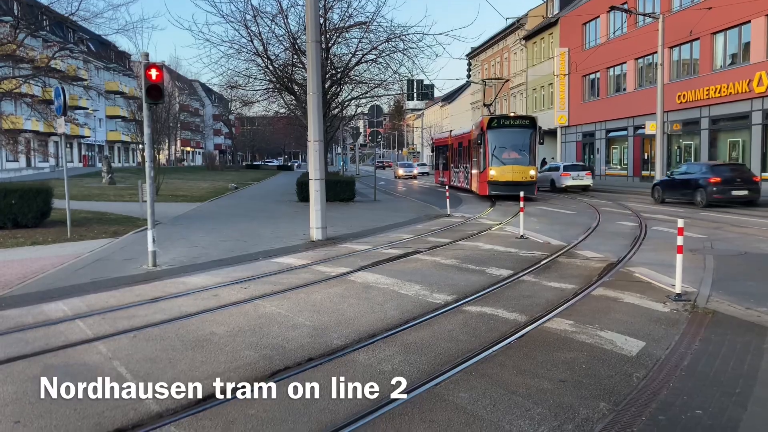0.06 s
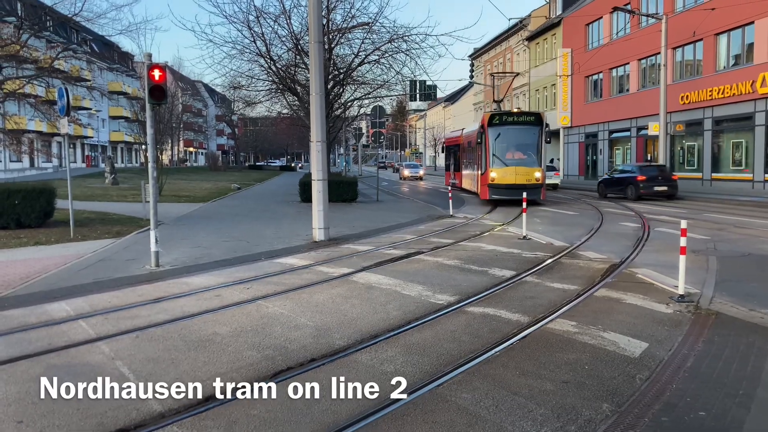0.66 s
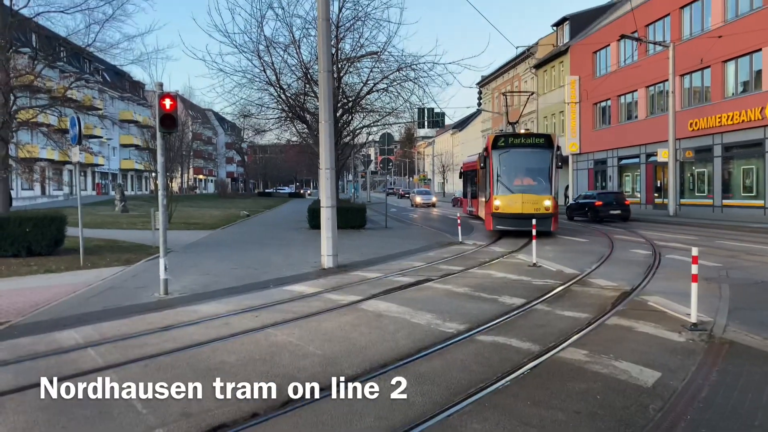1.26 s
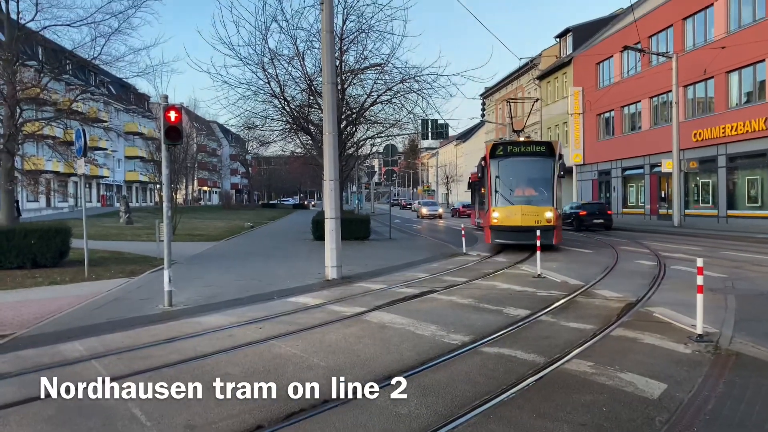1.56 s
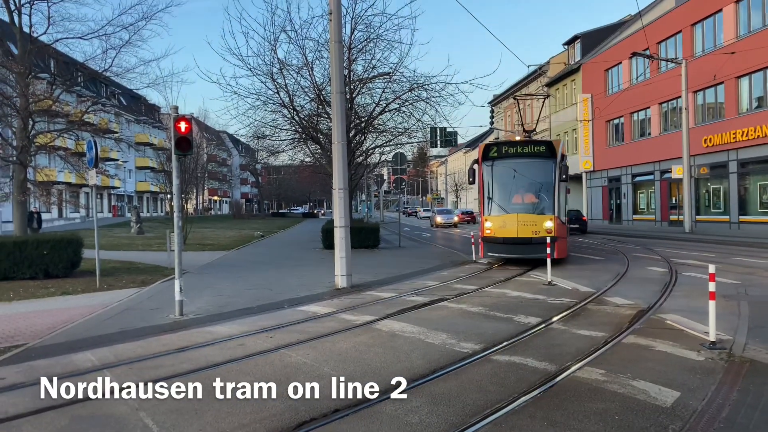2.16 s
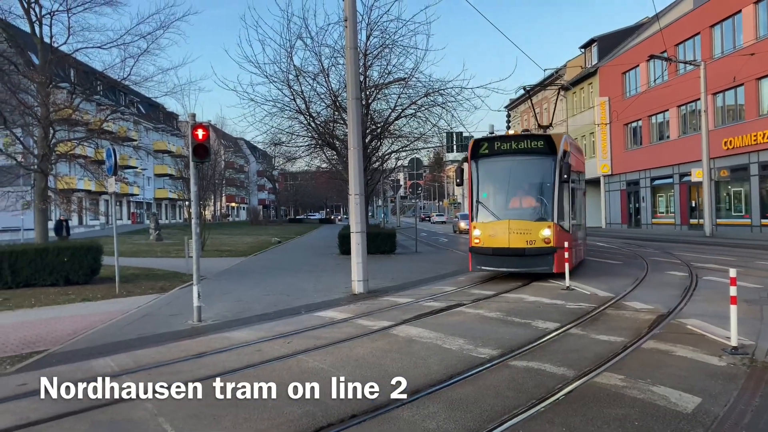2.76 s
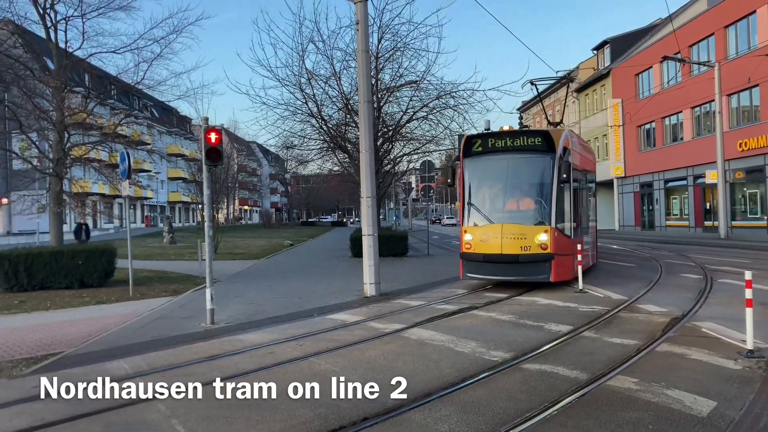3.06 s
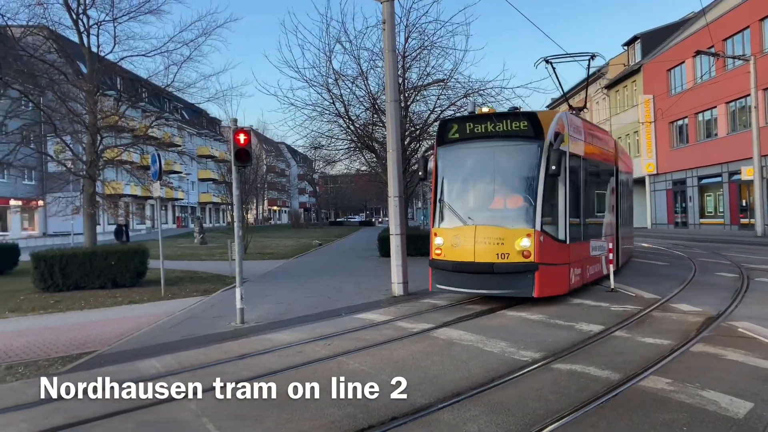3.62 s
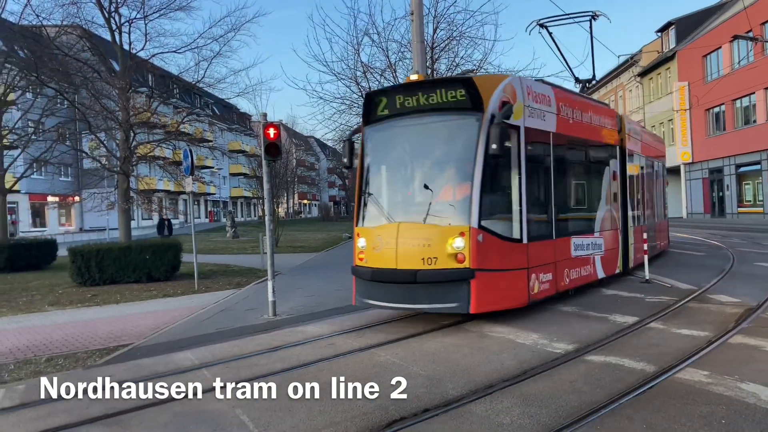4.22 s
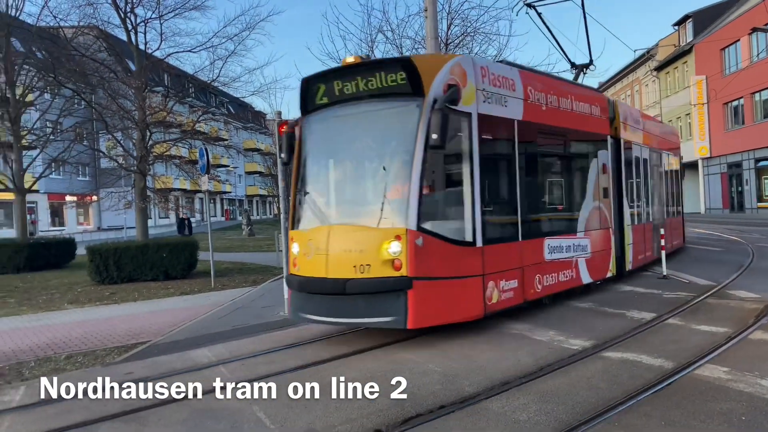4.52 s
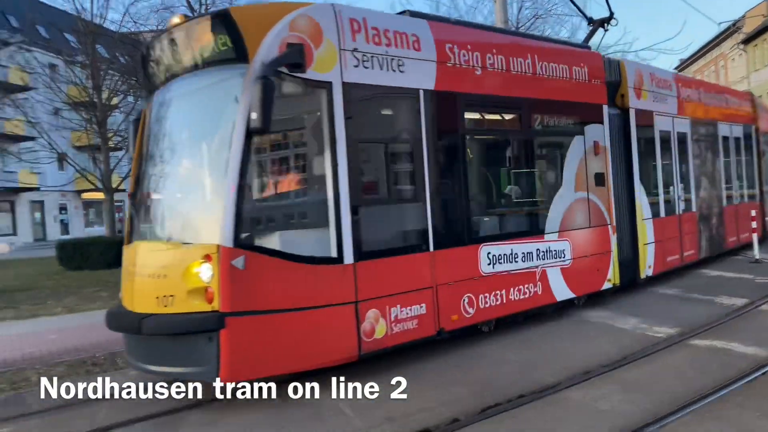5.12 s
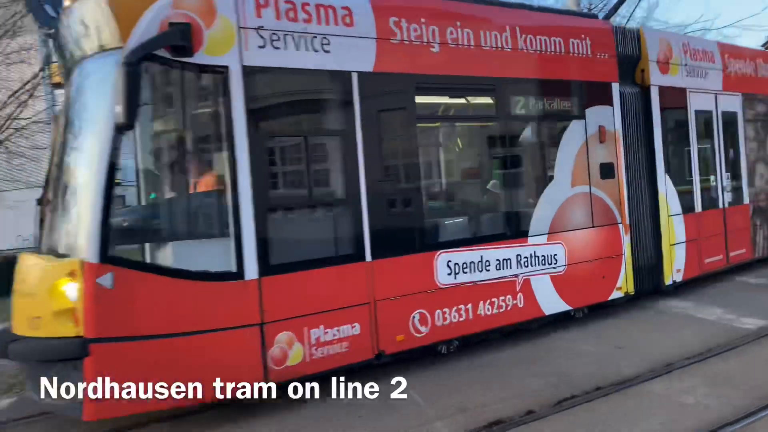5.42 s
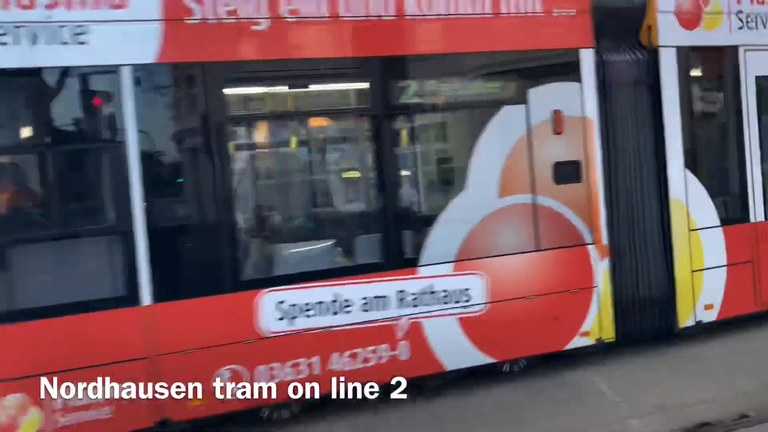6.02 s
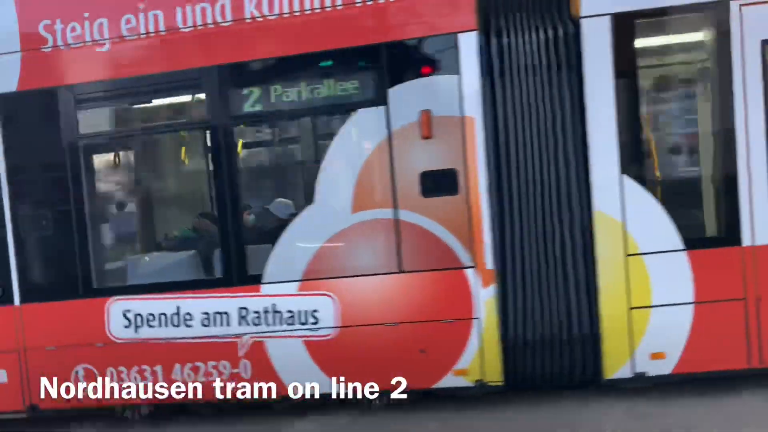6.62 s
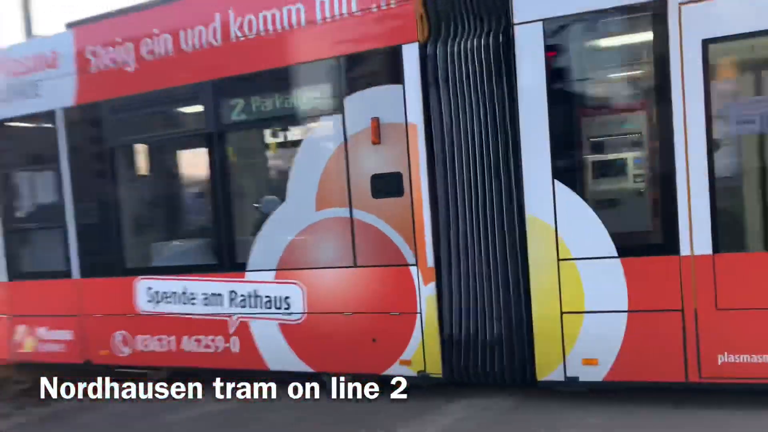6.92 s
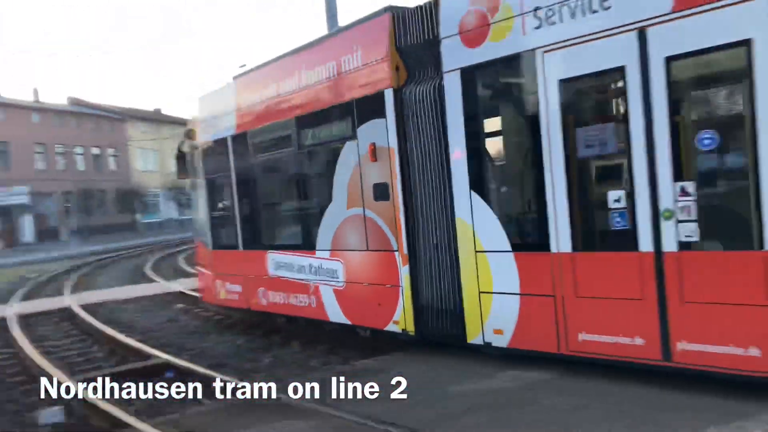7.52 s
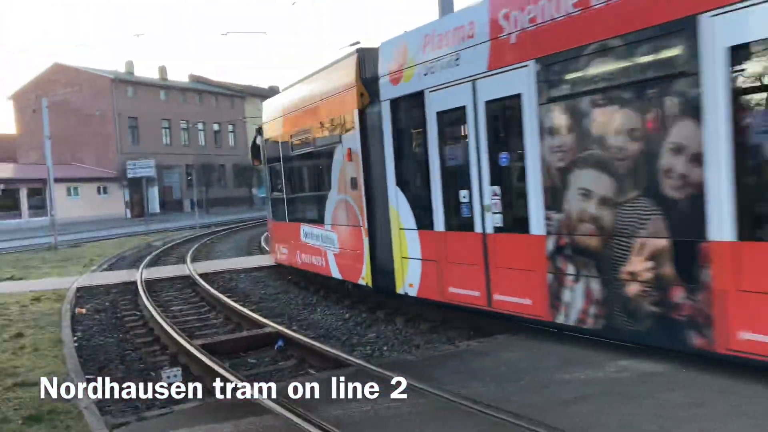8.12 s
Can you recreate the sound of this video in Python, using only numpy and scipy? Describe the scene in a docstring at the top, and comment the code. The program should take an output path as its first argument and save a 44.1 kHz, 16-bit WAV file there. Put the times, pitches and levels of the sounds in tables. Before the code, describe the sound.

On a street curve, a tram rumbles nearer, clicking over rail joints above a faint hiss of departing cars. In the second half it rolls right past a hand-held microphone, louder, with humming gears, a high motor whine and steel wheels rubbing and ringing on the rails. Soft gusts touch the microphone, and a short squeak and a few heavy thuds come as it keeps rolling by.

```python
"""On a street curve, a low-floor tram rolls past about two metres from a hand-held phone.
Rail roughness forces its body to drone and rumble and its wheels to roar; the rubbing flanges hiss,
squeak and ring the wheel discs, gears hum, and the traction inverter whines with a Doppler shift.
Wheels clack and thud over rail joints, the house fronts reflect the clacks, and later grit ticks.
Air buffets the two microphone ports, and the tyre noise of cars fades up the street."""
import sys
import numpy as np
from scipy import signal
from scipy.fft import rfft, irfft
from scipy.io import wavfile

SR = 44100
rng = np.random.default_rng(int(sys.argv[2]) if len(sys.argv) > 2 else 0)


def pcm_store(signal):
    """Save signal as 16-bit PCM."""
    levels = np.round(np.clip(np.atleast_2d(signal), -1, 1) * 32767)
    wavfile.write(sys.argv[1], SR, levels.astype(np.int16).T)


N = 365148
TIME, FREQ = np.arange(N) / SR, np.arange(N // 2 + 1) * SR / N
TRAM_M_S, SOUND_M_S = 3.2, 343

# normal modes of a wheel disc: f/Hz, bandwidth before added damping/Hz, level/dB
WHEEL_MODES = [(630, 20, -2), (740, 14, 3), (850, 17, 0), (945, 15, 3), (1040, 15, 1.5), (1240, 14, -2),
               (1410, 18, -2), (1565, 14, 1.5), (1705, 16, 0), (2010, 20, -8), (2260, 16, -4),
               (2450, 18, -9), (3120, 18, -14)]
# bright, uneven treble hiss spectrum, with a dip near 9.5 kHz: f/Hz, level/dB
HISS_SPECTRUM = [(2500, -39), (4500, 1), (5700, -6.5), (7800, 2.5), (9500, -4.5), (11500, 0.5),
                 (13000, -10.5), (15500, -11.5)]


def undb(db):
    """Amplitude ratio of a level in decibels."""
    return 10 ** (np.asarray(db) / 20)


def unit(x):
    """Normalisation to rms 1."""
    return x / np.sqrt(np.mean(x ** 2))


def curves(table):
    """Linear interpolation of a table's columns over time."""
    times, *columns = np.transpose(table)
    return [np.interp(TIME, times, column) for column in columns]


def across(points):
    """Interpolation of (f/Hz, value) points on a log-frequency axis."""
    hz, value = np.transpose(points)
    return np.interp(np.log(FREQ + 1), np.log(hz), value)


def resonance(hz, width_hz):
    """Frequency response of a damped harmonic oscillator."""
    return 1 / (1 + 1j * (FREQ ** 2 - hz ** 2) / (FREQ * width_hz + 1e-9))


def walk(rate_hz, step=32):
    """Low-pass Gaussian fluctuation of rms 1 and bandwidth about rate_hz."""
    hz = np.fft.rfftfreq(16384, step / SR)
    coarse = irfft(rfft(rng.standard_normal(16384)) * np.exp(-(hz / rate_hz) ** 2))
    return unit(np.interp(np.arange(N) / step, np.arange(len(coarse)), coarse))


def noise(response):
    """Filtered noise, partially coherent between the two ports and most alike in the bass."""
    # likeness of the ports: f/Hz, coherence (0-1)
    port_coherence = [(60, .97), (130, .97), (290, .93), (640, .8), (1400, .66), (3000, .3), (5000, .4),
                      (7000, .85), (15000, .85)]
    coherence = np.clip(across(port_coherence), 0, 1)
    mid, side = rfft(rng.standard_normal((2, N)))
    spectra = mid * np.sqrt(1 + coherence) + np.array([[1], [-1]]) * side * np.sqrt(1 - coherence)
    return unit(irfft(response * spectra, N))


def narrow(hz, smear_hz):
    """Narrow-band noise: a carrier with random quadrature amplitudes."""
    phase = 2 * np.pi * np.cumsum(hz + np.zeros(N)) / SR
    return walk(smear_hz) * np.sin(phase) + walk(smear_hz) * np.cos(phase)


def wavering(hz, jitter_hz, rate_hz):
    """Random frequency modulation of a tone of constant amplitude."""
    return np.sqrt(2) * np.sin(2 * np.pi * np.cumsum(hz + jitter_hz * walk(rate_hz)) / SR)


def burst(start, rise, fade):
    """Envelope of a transient: linear rise, exponential decay."""
    age = np.maximum(TIME - start, 0)
    return np.minimum(age / rise, 1) * np.exp(-np.minimum(np.maximum(age - rise, 0) / fade, 20))


def add(track, start, sound):
    """Superposition of a short sound on a track."""
    room = track[:, int(start * SR):][:, :sound.shape[-1]]
    room += sound[..., :room.shape[1]]


def later(x, lag_s):
    """A time-varying delay."""
    return np.interp(TIME - lag_s, TIME, x)


def nearness(passes_s, distance_m):
    """Spherical spreading: the 1/r gain of a moving source, 1 at closest approach."""
    return distance_m / np.hypot(distance_m, TRAM_M_S * (TIME - passes_s))


def go_by(passes_s, distance_m, far_db, shade_db_per_s=0):
    """Direct and diffuse fields add in power; once a part is past, the body may screen it."""
    shade_db = shade_db_per_s * np.maximum(TIME - passes_s, 0)
    return np.hypot(nearness(passes_s, distance_m), undb(far_db)) * undb(-shade_db)


def doppler(passes_s=6.3, distance_m=3):
    """Doppler ratio: above 1 on approach, below 1 on retreat."""
    along = TRAM_M_S * (TIME - passes_s)
    return 1 - TRAM_M_S / SOUND_M_S * along / np.hypot(along, distance_m)


def passing(x, reflection=0.084, far_s=0.00238, near_s=0.01, lead_ms=0.28):
    """Comb filtering by a road reflection; its delay and the left port's lead grow as the wheels near."""
    near = nearness(passes_s=5.85, distance_m=2.03) ** 2
    detour_s = far_s + (near_s - far_s) * near
    left, right = ((side + reflection * later(side, detour_s)) / np.hypot(1, reflection) for side in x)
    return np.array([left, later(right, lead_ms * near / 1000)])


def street(x, t60, wet_db):
    """Reverberation: the house fronts return a dull, diffuse tail."""
    age = TIME[:SR]
    tail = rng.standard_normal((2, SR)) * undb(-60 * age / t60) * (age > .02)
    tail = signal.sosfilt(signal.butter(1, [250, 3000], "band", fs=SR, output="sos"), tail)
    tail /= np.sqrt(np.sum(tail ** 2) / 2)
    return x + undb(wet_db) * signal.fftconvolve(x, tail, axes=1)[:, :N]


def cars(hiss_db=-56, tread_db=-48, leave_s=1.76, fade_db_per_s=17):
    """Broadband tyre noise holds, then fades as the cars drive off."""
    hiss = undb(hiss_db) * noise(undb(across(HISS_SPECTRUM)))
    tread = undb(tread_db) * noise(resonance(1450, 1700) ** 2)
    return (hiss + tread) * undb(walk(4.2) - fade_db_per_s * np.maximum(TIME - leave_s, 0))


def draught(breeze_db=-44, eddy_db=-5, buffet_db=-4):
    """Turbulent pressure at the ports, from a light breeze and air dragged along by the tram."""
    # gusts of air: t/s, level/dB, rise/s, decay/s
    gust_events = [(3.9, -38, 0.083, .08), (4.8, -23, 0.14, 0.1), (5.76, -26, 0.076, 0.057),
                   (7.92, -19, 0.086, .18)]
    gusts = sum(undb(db) * burst(s, rise, fade) for s, db, rise, fade in gust_events)
    eddies = unit(irfft(rfft(rng.standard_normal((2, N))) * resonance(73, 85) ** 2, N))
    buffet = undb(buffet_db) * gusts * noise(resonance(45, 22) ** 2)
    return eddies * (undb(breeze_db) + undb(eddy_db) * gusts) + buffet


def treble_bursts():
    """Band-limited transients that decay exponentially: the hiss of two far clacks, then ticks of grit."""
    # short bursts of treble: t/s, level/dB, decay/s, lowest f/Hz, highest f/Hz
    transients = [(0.376, -50.5, 0.059, 6500, 12000), (.675, -51, 0.082, 6500, 12000),
                  (3.65, -39, 0.011, 2000, 3364), (3.711, -43, 0.0037, 4000, 5500),
                  (3.718, -41, 0.021, 1990, 3400), (3.727, -50, 0.018, 4000, 5640),
                  (4.844, -36.5, 0.015, 6800, 12100), (5.298, -45, 0.0098, 6960, 12000),
                  (6.259, -35, .0034, 9600, 12700), (7.46, -48, 0.0011, 3020, 12000),
                  (7.695, -31, 0.00078, 7230, 15540), (7.707, -39, .0015, 7000, 15500),
                  (7.725, -44, .015, 7000, 15000)]
    out, age = np.zeros((2, N)), TIME[:SR // 3]
    for s, db, fade, low_hz, high_hz in transients:
        band = signal.butter(3, [low_hz, high_hz], "band", fs=SR, output="sos")
        hiss = unit(signal.sosfilt(band, rng.standard_normal((2, len(age)))))
        add(out, s, undb(db) * hiss * np.exp(-age / fade))
    return out


def inverter(low_hz=3020, high_hz=6705, high_db=-55.5, sideband_db=-62):
    """Doppler-shifted switching tones of the traction drive, the high one with two lower sidebands."""
    # low whine as the roof units turn towards the listener and away: t/s, level/dB
    low_levels = [(0, -82), (2.5, -66.5), (3.3, -65), (4.2, -60), (4.7, -53.5), (5.0, -56), (5.55, -56.5),
                  (5.68, -47.5), (5.95, -54), (6.1, -51.5), (6.4, -58), (6.8, -57), (7.5, -65)]
    step_hz = 95 * (TIME < 4.15)  # the pitch steps up as the drive changes gear
    sag_hz = 36 * np.maximum(TIME - 6.1, 0)  # and sinks as the tram eases off
    heard_hz = (high_hz - step_hz - sag_hz) * doppler()
    # the low tone reaches each port by its own path
    low = np.array([wavering(low_hz * doppler(), 11, 35) * undb(1.2 * walk(14)) for port in range(2)])
    high = wavering(heard_hz, 10, 30) * undb(high_db + 2.5 * walk(20))
    sidebands = sum(narrow(heard_hz - offset_hz, 30) for offset_hz in (590, 785))
    sidebands *= undb(sideband_db) * nearness(passes_s=6.1, distance_m=2.5)
    roof = go_by(passes_s=6.44, distance_m=1.67, far_db=-32, shade_db_per_s=4)
    return undb(curves(low_levels)[0]) * low + (high + sidebands) * roof


def gears(steady_db=-1.5, loose_db=-4.5, jitter_hz=12, smear_hz=38, swell_db=1.5):
    """The tooth-meshing tone swells with the load; axles at nearly the same speed roughen it."""
    # hum of the gear teeth: t/s, f/Hz, level/dB
    meshing = [(0, 720, -56), (1.2, 722, -48), (3.7, 718, -51), (4.0, 742, -45), (4.6, 720, -46),
               (4.8, 730, -41), (4.96, 720, -44), (5.04, 736, -34), (5.13, 724, -42), (5.21, 745, -37),
               (5.32, 750, -42), (5.4, 708, -41), (5.55, 724, -43), (5.67, 723, -34), (5.74, 745, -44),
               (5.81, 742, -34), (5.93, 720, -43), (6.0, 708, -37), (6.1, 716, -44), (6.3, 736, -46),
               (6.55, 708, -37), (6.7, 702, -46), (6.82, 714, -40), (7.15, 722, -43), (7.4, 711, -56)]
    hz, db = curves(meshing)
    load = undb(db + swell_db * walk(12))
    return load * (undb(steady_db) * wavering(hz, jitter_hz, 24) + undb(loose_db) * narrow(hz, smear_hz))


def squeaks():
    """Stick-slip: a flange grabs the rail and one wheel mode swells, reaching each port by its own path."""
    # flange squeaks: t/s, f/Hz, bandwidth/Hz, level/dB, rise/s, decay/s
    grabs = [(5.2, 4430, 220, -49, 0.15, 0.3), (5.15, 1715, 53.5, -43, 0.4, 0.3),
             (4.95, 2310, 45, -53, 0.28, 0.64), (5.9, 2205, 35, -45, .25, 0.3),
             (6.3, 985, 65, -37, 0.34, 0.27), (6.85, 1550, 55, -47.5, 0.11, 0.12),
             (6.9, 2265, 36, -54, .2, 0.58), (7.70, 2255, 22, -41.5, 0.061, 0.078),
             (7.70, 1130, 13, -42, 0.058, .08), (7.722, 7350, 150, -46, 0.012, 0.021),
             (7.762, 3050, 28, -41.5, 0.015, 0.077), (7.9, 2270, 40, -50, 0.083, 0.58)]
    return sum(undb(db) * burst(s, rise, fade) * np.array([narrow(hz, width) for port in range(2)])
               for s, hz, width, db, rise, fade in grabs)


def rail_db():
    """Roughness excitation: the change in level on rough and smooth stretches of rail."""
    # stretches of rail: middle t/s, duration/s, level/dB
    patches = [(0.41, 0.23, 5.5), (0.716, 0.083, 13), (0.817, 0.097, 7.5), (1.012, 0.21, -5.5),
               (1.785, 0.28, 7), (2.31, 0.38, -1), (2.54, 0.14, 5.5), (2.832, 0.14, -1.5),
               (3.097, 0.097, 5.5), (3.371, 0.088, 4), (3.46, 0.04, 7), (3.645, 0.14, -4),
               (4.325, 0.59, 3.5), (7.017, 0.17, 2)]
    return sum(db * np.exp(-(2 * (TIME - s) / length) ** 2) for s, length, db in patches)


def wheels(ring_db=-39, rub_db=-46, hiss_db=-49.5, throb_db=2.7, rail_share=0.38):
    """Sliding friction: in the curve the flanges rub and hiss, and keep the wheel discs ringing."""
    # the rail's grip damps the modes, and they drift as the contact point moves
    ring = noise(sum(undb(db) * resonance(hz, 9 * width) ** 2 for hz, width, db in WHEEL_MODES))
    drift_s = .001 * walk(2)
    ring = np.array([later(side, drift_s) for side in ring])
    ring *= undb(ring_db + throb_db * walk(8.7)) * go_by(passes_s=6.99, distance_m=1.6, far_db=-37)
    # spectrum of flange rubbing: f/Hz, level/dB
    rub_spectrum = [(700, -38), (1500, -8), (2300, 4), (3300, -0.5), (4400, -3.5), (5500, -7),
                    (7500, -12.5), (12000, -53)]
    rub = noise(undb(across(rub_spectrum))) * go_by(passes_s=7.0, distance_m=7.4, far_db=-16)
    hiss = noise(undb(across(HISS_SPECTRUM)))
    hiss *= go_by(passes_s=6.64, distance_m=5.3, far_db=-26, shade_db_per_s=1.5)
    straight_db = -6 * np.clip(1 - (TIME - 3.61) / 0.54, 0, 1)  # less friction before the curve
    grain, scuff = undb(1.1 * walk(40)), undb(1.1 * walk(20))
    rub *= grain * undb(rub_db + straight_db / 2)
    hiss *= grain * scuff * undb(hiss_db + straight_db)
    return passing((ring + rub) * undb(rail_share * rail_db()), lead_ms=0.18) + hiss


def struck_wheel(centre_hz, rise_s, spread_octaves=0.59, scatter_db=3.5, damping=1.34):
    """Free vibration of a wheel disc; the point of contact favours the modes around one pitch."""
    hz, width, db = np.transpose(WHEEL_MODES)[:, :, None]
    hz = hz * (1 + .018 * rng.standard_normal(hz.shape))  # no two wheels ring alike
    age = TIME[:SR // 4]
    size = undb(db + scatter_db * rng.standard_normal(hz.shape))
    size *= np.exp(-(np.log2(hz / centre_hz) / spread_octaves) ** 2)
    decay = np.exp(-np.pi * damping * width * age)
    modes = size * decay * np.sin(2 * np.pi * (hz * age + rng.random(hz.shape)))
    return np.minimum(age / rise_s, 1) * modes.sum(axis=0) / np.sqrt(np.sum(size ** 2) / 2)


def clacks(clack_db=-10.5, bright_db=-12, ring_db=4, landing_s=0.0098, landing_db=1.5):
    """Impact excitation: a wheel leaves one rail end and lands on the next, ringing the disc."""
    # wheels on rail joints: t/s, level/dB, relative treble/dB, decay/s, centre f/Hz of the ring
    joints = [(0.059, -31, -6.5, 0.12, 1090), (.255, -32, -2, 0.01, 900), (0.377, -31, 3.5, 0.02, 1290),
              (0.674, -30, 1.5, 0.03, 1000), (0.789, -34, -8, 0.018, 900), (.825, -37, -10, 0.013, 1000),
              (1.1, -35, -3, 0.048, 800), (1.615, -37, -3, .015, 1400), (1.669, -33, -2, 0.031, 1240),
              (1.759, -33, -6, .012, 1010), (1.804, -38, -5, .015, 1000), (1.867, -39, -5, .015, 1090),
              (1.922, -37, -4, .014, 1200), (2.458, -33, -15, .012, 694), (2.824, -48, -12, 0.0096, 720),
              (3.056, -30, -15, 0.0081, 691), (3.345, -34.5, -1, 0.011, 690), (4.239, -40, 7, 0.014, 950),
              (4.438, -34, 8, 0.0071, 1099), (4.743, -35, -14, .008, 744), (5.824, -22.5, 2.5, 0.03, 1860),
              (5.846, -23.5, -4, 0.014, 840), (6.184, -21, 0.5, 0.012, 700), (6.674, -22, 1.5, 0.015, 1192),
              (7.698, -39.5, 20.5, 0.015, 2220), (7.759, -38, 18, 0.031, 2300),
              (8.074, -32, -8, 0.0083, 752), (8.169, -26.5, 2, 0.019, 1140)]
    # spectrum of a steel blow: f/Hz, level/dB
    steel_spectrum = [(100, -12), (330, 11), (550, -3), (800, 19), (1200, 17), (1700, 12), (2500, -4),
                      (3500, -14), (6000, -5), (14000, -28)]
    force, treble_force = np.zeros((2, N))
    ring = np.zeros((2, N))
    for s, db, treble_db, fade, ring_hz in joints:
        leaving = burst(s - .001, 0.001, fade)
        landing = undb(landing_db) * burst(s + landing_s, 0.0015, fade)
        blow = undb(db) * np.maximum(leaving, landing)
        force += blow
        treble_force += undb(treble_db) * blow
        add(ring, s, undb(db + ring_db) * struck_wheel(ring_hz, landing_s))
    steel = undb(clack_db) * force * noise(undb(across(steel_spectrum)))
    treble = undb(bright_db) * treble_force * noise(resonance(1940, 2050) ** 3)
    return steel + ring + treble


def thuds(thud_db=-1, knock_db=-2, knock_top_hz=580):
    """Damped oscillation: heavy blows swing a body panel briefly, with a dull knock on top."""
    # blows on the body: t/s, level/dB, f/Hz, glide/(Hz/s), rise/s, decay/s, relative knock/dB
    blows = [(.66, -13.5, 134, -87, 0.031, 0.057, -14), (3.075, -20.5, 199, 0, 0.011, 0.059, -2),
             (3.34, -15.5, 137, 3, .012, 0.029, -8), (4.734, -11, 200, 0, 0.011, 0.0072, -18),
             (4.82, -18, 166.5, -700, 0.025, 0.044, -32), (5.099, -10.5, 161.3, 403, 0.048, 0.024, -16),
             (5.797, -13, 86, -300, 0.0034, 0.024, -17), (5.835, -22, 278, 0, 0.0087, 0.017, 2),
             (6.187, -18, 206.4, -2, 0.0025, 0.018, 7.5), (6.311, -7.5, 129, 0, .0062, 0.021, -28),
             (6.679, -23.5, 230, 0, 0.0054, 0.018, 6), (7.334, -24.5, 266.7, -330, 0.0058, 0.19, -13),
             (8.049, -6.5, 176, 5, 0.0115, 0.007, -3.5), (8.072, -5, 87.6, 0, 0.005, 0.0086, -4),
             (8.158, -13, 126, 2, 0.0034, 0.0099, 2.5), (8.202, -4.5, 82, 0, 0.013, 0.0069, -10.5)]
    swing, force = np.zeros((2, N))
    for s, db, hz, glide, rise, fade, hard_db in blows:
        blow, age = undb(db) * burst(s - .001, rise, fade), TIME - s
        swing += blow * np.sin(2 * np.pi * (hz + glide * age / 2) * age)
        force += undb(hard_db) * blow
    knock = noise(resonance(210.0, 470) / (1 + (FREQ / knock_top_hz) ** 6))
    return undb(thud_db) * swing + undb(knock_db) * force * knock


def panels(swell_db=4.5):
    """Plate resonance: underframe panels hum at their own pitches, each swelling by itself."""
    # panel modes: f/Hz, bandwidth/Hz, level/dB
    modes = [(221, 52, -3), (285, 60, -0.5), (348, 81, 1)]
    return sum(undb(db + swell_db * walk(6.3)) * noise(resonance(hz, width) ** 2)
               for hz, width, db in modes)


def rolling(rumble_db=-25.5, roar_db=-38.0, frame_db=-39.5, judder_db=2, rough_db=1.34, uneven_db=1.45):
    """Rolling noise: uneven rail heads shake bogies and underframe, and roar; all judder together."""
    # spectrum of the bogies' rumble: f/Hz, level/dB
    rumble_spectrum = [(20, -46), (44, -13), (57, 5.5), (92, 2), (112, 0.5), (138, -1), (175, -1.5),
                       (260, -4), (350, -9.5), (450, -18.5), (800, -57), (2000, -71)]
    # spectrum of the wheel-rail roar: f/Hz, level/dB
    roar_spectrum = [(150, -13), (300, -32), (400, -8), (530, -4), (680, -3), (880, -5), (1150, -11.5),
                     (1550, -12.5), (2100, -21.5), (3000, -37), (6000, -70)]
    bumps, shake_db = walk(34.0), rail_db() + uneven_db * walk(14.5)
    rumble = noise(undb(across(rumble_spectrum))) * undb(rumble_db)
    rumble *= go_by(passes_s=6.63, distance_m=4.9, far_db=-4.5)
    frame = panels() * undb(frame_db) * go_by(passes_s=7.05, distance_m=3.83, far_db=-38)
    roar = noise(undb(across(roar_spectrum)))
    roar *= undb(roar_db + shake_db + rough_db * (bumps + walk(25)) / np.sqrt(2))
    roar *= go_by(passes_s=6.37, distance_m=4.4, far_db=-1.5, shade_db_per_s=1.0)
    return (rumble + frame) * undb(0.48 * shake_db + judder_db * bumps), roar


def drone(wander_hz=2.2, octave_db=-7, loose_db=-9, beat_period_s=.176, beat_peak_s=2.31):
    """Forced vibration: wheel roughness drives a low body resonance, which throbs as the bogies beat."""
    # boom of the car body: t/s, level/dB
    boom_levels = [(0.0, -23.5), (0.95, -34), (1.2, -26), (1.58, -24), (1.77, -15.5), (2.0, -26),
                   (2.55, -22.5), (2.8, -30), (3.0, -29), (3.3, -35.5), (3.9, -27.5), (4.25, -21),
                   (4.55, -23), (4.85, -22.5), (5.3, -28.5), (5.8, -26), (6.25, -36.5), (6.55, -18.5),
                   (7.15, -27.5), (7.45, -55), (7.68, -22.5), (7.9, -46), (8.02, -27), (8.07, -9),
                   (8.125, -37), (8.2, -25), (8.28, -60)]
    # pitch and throb of the boom: t/s, f/Hz, signed beat depth/dB
    boom_pitch = [(0, 70.2, 1), (1.1, 64.37, -1.5), (1.65, 66, 1), (1.9, 70.1, 1.5), (2.1, 71, 4),
                  (2.4, 71.5, 4.5), (2.8, 70.38, -1.5), (3.8, 70.6, 2), (4.15, 71.9, 3.5),
                  (4.8, 72.17, -0.5), (5.3, 68.27, 1), (5.8, 67.73, 0.5), (6.6, 66.15, 1.5)]
    hz, throb_db = curves(boom_pitch)
    phase = 2 * np.pi * np.cumsum(hz + wander_hz * walk(8.2)) / SR
    flutter = undb(walk(32) + np.array([walk(3.6), walk(5.6)]) / 2)  # a little different at each port
    throb = undb(throb_db * np.cos(2 * np.pi * (TIME - beat_peak_s) / beat_period_s))
    tone = (np.sin(phase) + undb(octave_db) * np.sin(2 * phase + walk(16) / 2)) * flutter * throb
    loose = undb(loose_db) * noise(resonance(76.1, 38) ** 4)
    return undb(curves(boom_levels)[0]) * (unit(tone) + loose)


def scene():
    """Superposition of the tram and its street."""
    rumble, roar = rolling()
    bogies = passing(roar + gears() + street(clacks(), t60=1.0, wet_db=-21.0))
    tram = drone() + rumble + bogies + wheels() + inverter() + squeaks() + thuds() + treble_bursts()
    return tram + draught() + cars()


def record(dry, ceiling=1.05, top_hz=15800):
    """Transfer function of the phone's two ports, then soft saturation and a low-pass filter."""
    # colour of the ports: f/Hz, left minus right level/dB
    port_tilt = [(300, 0), (500, -1), (750, -2.2), (1300, 0), (2400, 1.3), (3400, 2.8), (5000, -.6),
                 (8000, 0)]
    # phase between the ports: f/Hz, left minus right phase/rad
    port_phase = [(0, 0), (150, -.04), (300, -.2), (700, -.85), (1300, -1.35), (1900, -1.6), (2600, -4.7),
                  (3300, -4.9), (4000, -1.2), (5500, -3.2), (6600, -6.2), (7400, -6.5), (7800, -8.1),
                  (16000, -18.9)]
    gain = undb(np.array([[.5], [-.5]]) * across(port_tilt))
    phase = np.array([[1], [0]]) * np.interp(FREQ, *np.transpose(port_phase))
    heard = irfft(rfft(dry) * gain * np.exp(1j * phase), N)
    heard = heard / (1 + (heard / ceiling) ** 4) ** (1 / 4)
    return signal.sosfilt(signal.ellip(10, .2, 80, top_hz, fs=SR, output="sos"), heard)


dry = scene()
out = record(dry)
pcm_store(out)
```